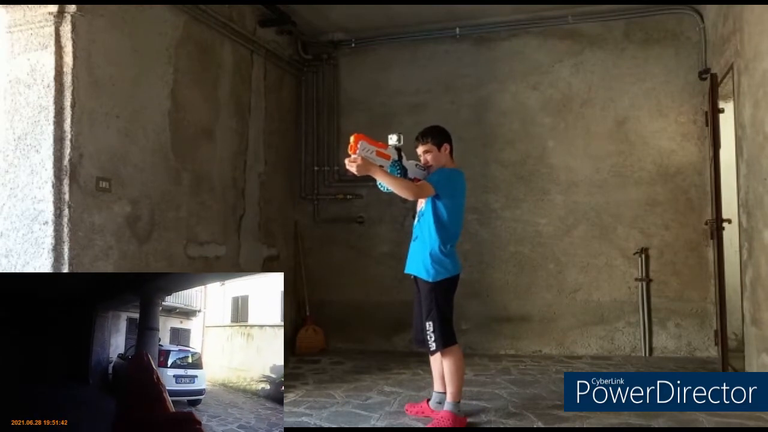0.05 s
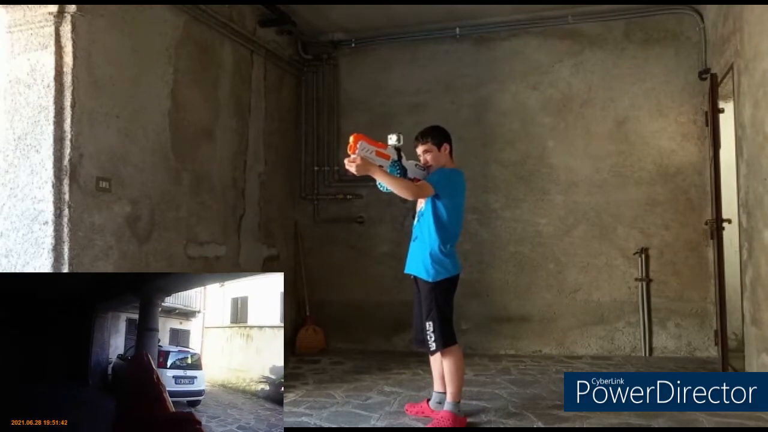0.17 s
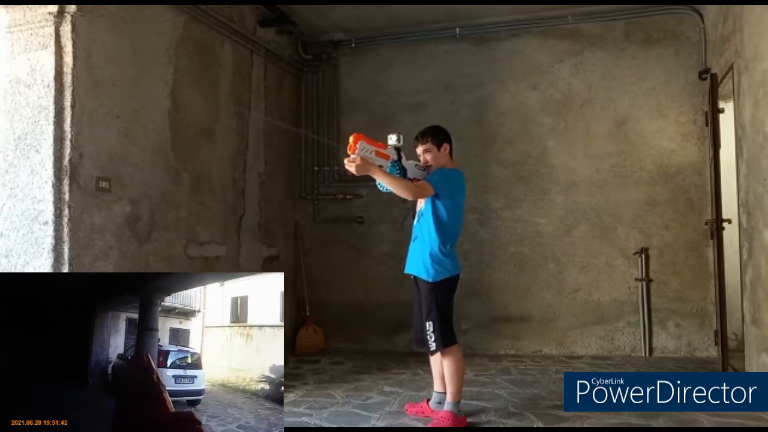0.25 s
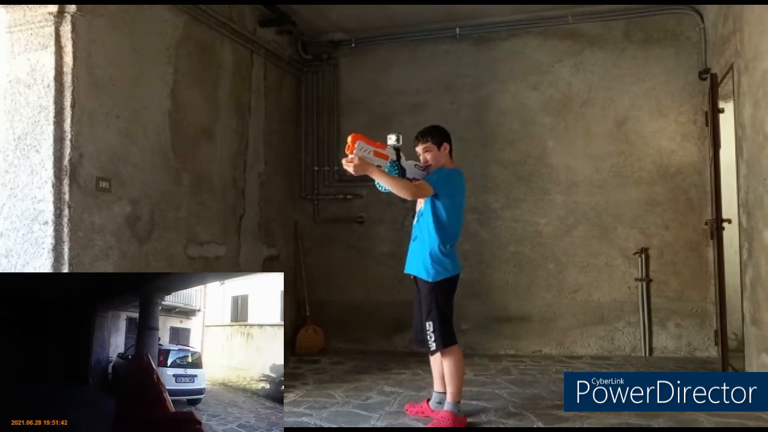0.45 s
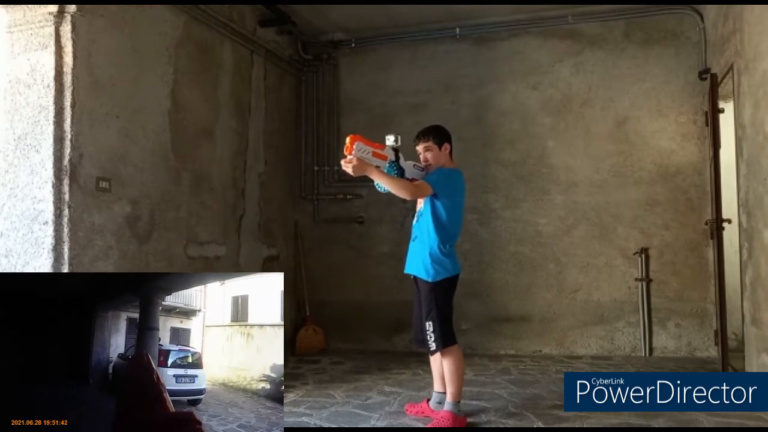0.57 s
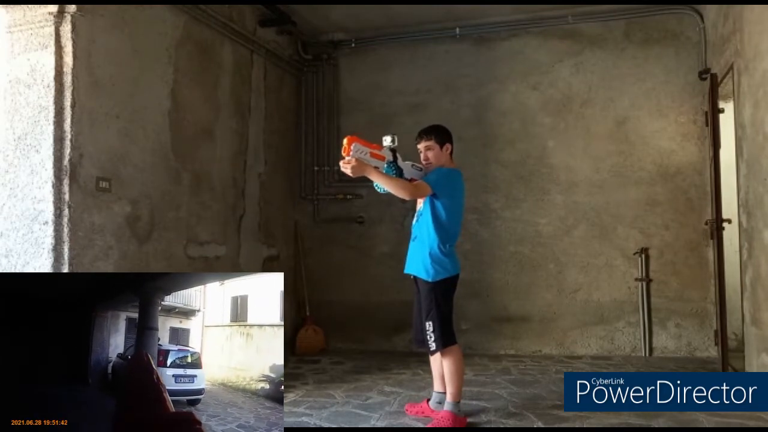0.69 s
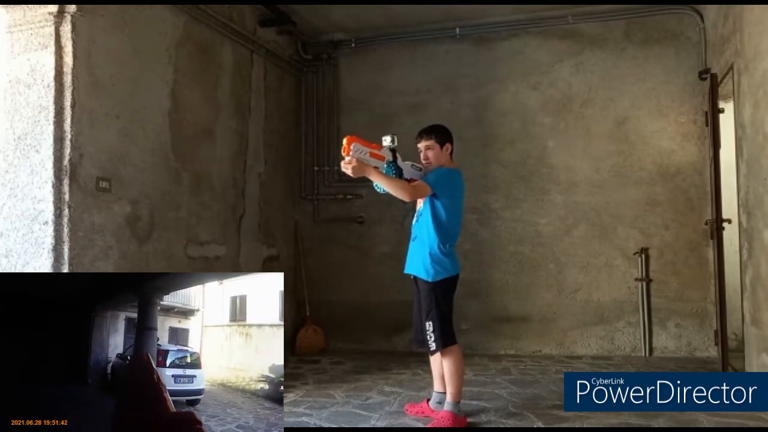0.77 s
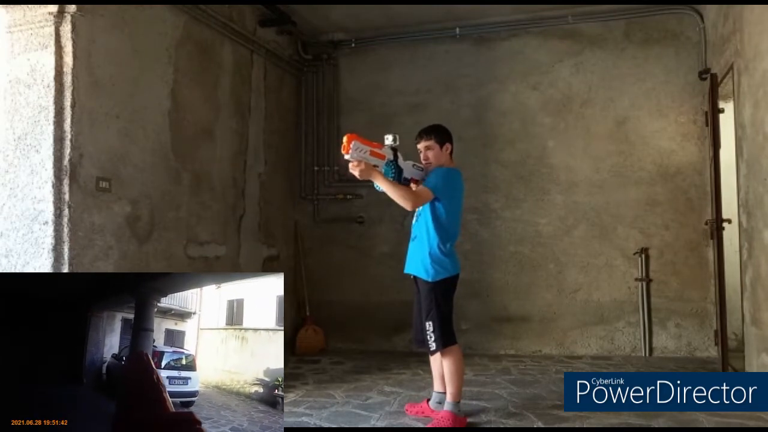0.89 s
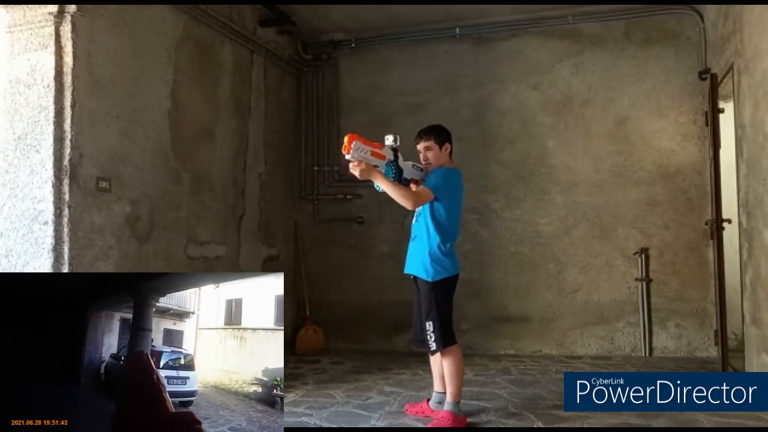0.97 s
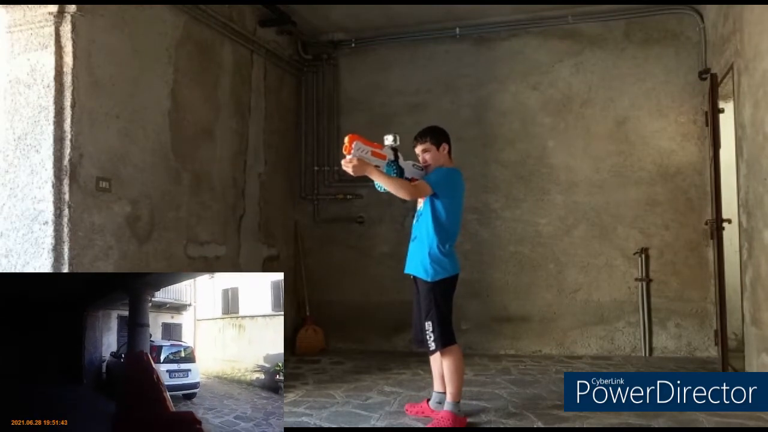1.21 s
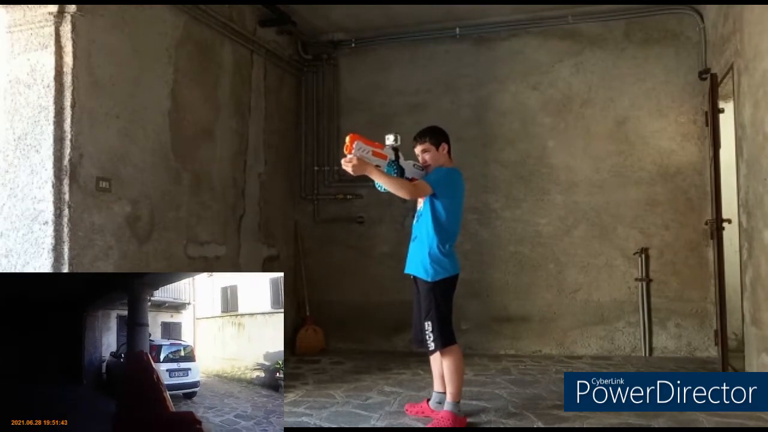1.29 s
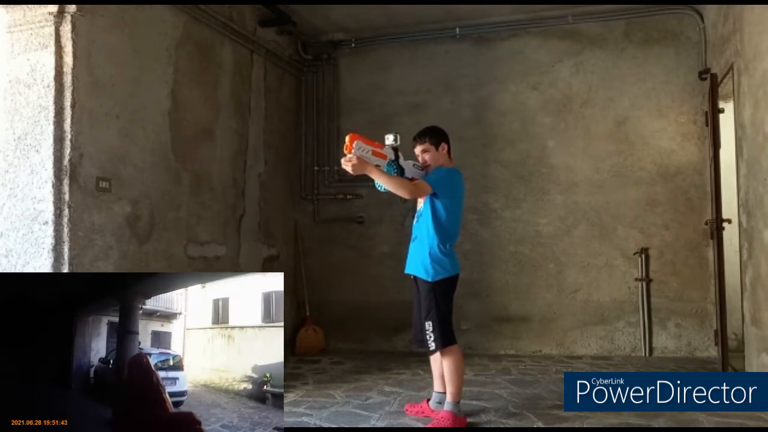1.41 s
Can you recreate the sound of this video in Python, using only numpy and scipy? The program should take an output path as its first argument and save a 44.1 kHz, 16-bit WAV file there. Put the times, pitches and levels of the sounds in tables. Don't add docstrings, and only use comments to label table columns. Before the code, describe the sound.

After a faint trigger creak, one sharp toy gun thump rings through a bare stone room; its tail fades under a quick cluster of plastic cocking clacks and a final softer knock, heard from a few metres.

```python
import sys
import numpy as np
from scipy import signal
from scipy.fft import rfft, irfft
from scipy.io import wavfile
from scipy.ndimage import uniform_filter1d

SR = 44100
rng = np.random.default_rng(int(sys.argv[2]) if len(sys.argv) > 2 else 0)


def level_to_linear(level):
    exponent = np.asarray(level, float) / 20
    return 10 ** exponent


def bounce(signal):
    frames = np.transpose(np.atleast_2d(signal))
    limited = np.clip(frames, -1, 1)
    pcm = np.round(limited * 32767).astype(np.int16)
    wavfile.write(sys.argv[1], SR, pcm)


N = 63945

KNOCK_S = [.7512, .7548, .804, .8126, .845, .865, .8675, .8762, .881, .915, 1.1775, 1.1798, 1.19, 1.202]


def at(s):
    return int(s * SR)


def unit(x):
    return x / np.sqrt(np.sum(x ** 2))


def decay(t, t60):
    return np.exp(-np.log(1000) * t / t60)


def curve(hz, table):
    table = np.array(table)
    return np.interp(np.log(np.maximum(hz, 1)), np.log(table[:, 0]), table[:, 1])


def colour(x, table, modes=(), size=8192):
    f = np.arange(size // 2 + 1) * SR / size
    power = level_to_linear(curve(f, table)) ** 2
    for hz, db, t60 in modes:
        detune = (f - hz) * 2 * np.pi * t60 / np.log(1000)
        power = power + level_to_linear(db) ** 2 / (1 + detune ** 2)
    cepstrum = irfft(np.log(power) / 2)
    cepstrum[1:size // 2] *= 2
    cepstrum[size // 2 + 1:] = 0
    response = unit(irfft(np.exp(rfft(cepstrum))))
    return signal.fftconvolve(x, response)[:len(x)]


def ring(x, modes):
    t = np.arange(N) / SR
    body = sum(level_to_linear(db) * np.sin(2 * np.pi * hz * t) * decay(t, t60) for hz, db, t60 in modes)
    return signal.fftconvolve(x, body)[:N]


def burst(s, db, length):
    out, t = np.zeros(N), np.arange(2048) / SR
    noise = rng.standard_normal(len(t))
    noise[0] = -3
    for _ in range(6):
        spec = rfft(noise * np.exp(-t / length))
        noise = irfft(spec / np.abs(spec))
        noise = noise * np.exp(np.minimum(t / length, 4)) / np.max(np.abs(noise))
        noise = np.clip(noise, -1, 1)
    out[at(s):at(s) + len(t)] = 2 * level_to_linear(db) * noise * np.exp(-t / length)
    return out


def tick(s, db):
    out = np.zeros(N)
    out[at(s)] = level_to_linear(db)
    return out


def town_hum():
    # pitch_hz, level_db per Hz
    traffic = [(18, -60), (30, -19), (318, -16), (402, -12.5), (431, -6), (484, -22), (519, -19),
               (810, -30.5), (8000, -62), (10400, -88), (17600, -120)]
    level_db, width = -65, 0.58
    mid, side = (colour(rng.standard_normal(N + 4096), traffic)[4096:] for _ in range(2))
    return level_to_linear(level_db) * np.array([mid + width * side, mid - width * side])


def garage():
    # pitch_hz, t60_s
    room_t60 = [(60, 2.1), (250, 1.65), (500, 1.16), (1200, 0.99), (2500, 0.94), (5000, 0.69), (9000, 0.51),
                (15000, 0.19)]
    # pitch_hz, level_db, t60_s
    room_modes = [(75.1, 5, 1.16), (134.6, 0, 2), (212.5, 3, 2.54), (257.2, 0.5, 2.3), (578.7, 1.5, 1.93)]
    room_db, modes_db = 9, -8
    first_echo_s, build_s = 0.00405, 0.0011
    alike_hz, bass_side = 700, 0.06
    t, f, out = np.arange(N) / SR, np.arange(N // 2 + 1) * SR / N, 0
    mid, side = rfft(rng.standard_normal((2, N)))
    side = side * np.sqrt(bass_side ** 2 + f ** 2 / (f ** 2 + alike_hz ** 2))
    pair = np.array([mid + side, mid - side])
    for octave in np.arange(4.5, 15, .5):
        share = np.clip(1 - 2 * np.abs(np.log2(f + 1) - octave), 0, 1)
        out = out + irfft(pair * share, N) * decay(t, curve(2 ** octave, room_t60))
    late = np.maximum(t - first_echo_s, 0)
    out = out * (1 - np.exp(-late / build_s))
    boom = level_to_linear(modes_db - 45.5) * ring(tick(first_echo_s, 0), room_modes)
    return level_to_linear(room_db) * np.sqrt(2) * unit(out) + boom


def spring_hum():
    start_s, end_s, pull_s = .765, .872, 0.026
    pitch_hz, sag_hz, settle_s = 284.7, 24.59, 0.011
    level_db, flutter_db, t60_s = -33, 3.5, 0.07
    t = np.arange(N) / SR
    pull = np.clip((t - start_s) / pull_s, 0, 1) * decay(np.maximum(t - end_s, 0), t60_s)
    hz = pitch_hz - sag_hz * np.exp(-np.maximum(t - start_s, 0) / settle_s)
    wobble = uniform_filter1d(rng.standard_normal(N), size=600)
    level = level_to_linear(level_db + flutter_db * 15 * np.roll(wobble, N // 2))
    return level * pull * np.sin(2 * np.pi * np.cumsum(hz) / SR + 6 * wobble)


def slide_scrape():
    # start_s, end_s, start_db, end_db
    strokes = [
        (0.787, 0.845, -73, -36.5),
        (0.858, 0.86, -60, -39.5),
    ]
    grains_per_s, spread_db = 2000, -1
    t = np.arange(N) / SR
    grains = (rng.random(N) < grains_per_s / SR) * rng.standard_normal(N)
    grains = grains * level_to_linear(spread_db * rng.exponential(size=N))
    swell = sum(level_to_linear(np.interp(t, [a, b], [db0, db1])) * (t > a) * (t < b) for a, b, db0, db1 in strokes)
    return grains * swell


def slide():
    # level_db, rattle_s, body_db
    blows = [(-43.5, 0.0053, -40.5), (-40.5, 0.0032, -25), (-44, 0.011, 3), (-45, 0.0077, 11.5),
             (-28, 0.0037, -28), (-27.5, 0.0075, -8.5), (-28, 0.0044, -4.5), (-24, 0.0086, -10),
             (-26, 0.0049, -13.5), (-35, 0.019, -5), (-35, 0.00269, -12.5), (-33.5, 0.0037, -23.5),
             (-44, 0.013, -15), (-56, 0.0062, -10)]
    # pitch_hz, level_db per Hz
    knock_colour = [(60, -33), (150, -28), (570, -13), (1400, -11), (3000, -13), (4500, -13.5), (9000, -19),
                    (16000, -26)]
    # pitch_hz, level_db, t60_s
    slide_body = [(610.6, -2.5, 0.061), (900, 3.5, 0.021), (1146, 6, 0.013), (1552, 4.5, 0.055),
                  (2150, -18, 0.0092), (2940, 6.5, 0.011), (8700, -29, 0.0066)]
    # pitch_hz, level_db, t60_s
    catch = [(2770, -9, 0.069), (7660, -5.5, 0.016), (855, -6, 0.083), (580, 4, 0.019), (1700, 1.5, 0.027)]
    # pitch_hz, level_db, t60_s
    grip = [(597.7, -3.5, 0.17), (787, 3.5, 0.03), (2168, -1, 0.043), (1440, -6.5, 0.056),
            (2970, -3.5, 0.033), (3830, 2.5, 0.022)]
    catch_db, grip_db = -35.5, -44
    scrape = slide_scrape()
    knocks = sum(burst(s, db, length) for s, (db, length, _) in zip(KNOCK_S, blows))
    pushes = sum(tick(s, db + body_db) for s, (db, _, body_db) in zip(KNOCK_S, blows))
    contact = colour(knocks + 3 * scrape, knock_colour)
    body = ring(.5 * pushes + 0.062 * scrape, slide_body)
    catch_ring = ring(tick(KNOCK_S[0], catch_db), catch)
    grip_ring = ring(tick(KNOCK_S[-3], grip_db), grip)
    return contact + body + catch_ring + grip_ring


def trigger_creaks():
    # start_s, level_db
    creaks = [
        (0.139, -74.5),
        (0.181, -64.5),
    ]
    # pitch_hz, level_db per Hz
    creak_colour = [(350, -57), (600, -2.5), (1970, -7), (4390, -15.5), (8280, -20), (10000, -25),
                    (13000, -65), (22000, -120)]
    return colour(sum(burst(s, db, 0.017) for s, db in creaks), creak_colour)


def plunger_bounce():
    # pitch_hz, level_db, t60_s
    rebound = [(1250, 0.5, 0.066), (1546, 1, 0.068), (1030, -7.5, 0.044), (575.8, -21.5, 1.9)]
    late_bounce = level_to_linear(-27.5) * unit(burst(.2425, 0, 0.0083))
    early_bounce = level_to_linear(-21) * unit(burst(0.24, 0, 0.00256))
    return ring(late_bounce + early_bounce, rebound)


def plunger_shot():
    # pitch_hz, level_db per Hz
    slam_colour = [(40, -20), (80, -9), (400, -16.5), (1350, -8.5), (3400, -26), (5600, -24.5),
                   (8500, -22.5), (15000, -34.5)]
    # pitch_hz, level_db, t60_s
    barrel = [(1266, -3.5, 0.016), (1492, -1.5, 0.031), (1042, -8, 0.03), (1134, -7, 0.018),
              (1562, -4, 0.083), (2070, -14.5, 0.0095), (4244, -7, 0.01), (550, -10, 0.032)]
    rush_s, rush_db, rise_db_per_s = 0.18, -18.5, 4600
    slam_s, slam_db, settle_s = .2282, -6, 0.0049
    t = np.arange(N) / SR
    swell = level_to_linear(rush_db - rise_db_per_s * (slam_s - t)) * (t > rush_s) * (t < slam_s)
    rush = rng.standard_normal(N) * swell
    return colour(rush + burst(slam_s, slam_db, settle_s), slam_colour, barrel)


def direct_rings():
    # pitch_hz, level_db, t60_s
    crack = [(4340, -10, 0.014), (1680, -9, 0.0012), (7200, -15.5, .004), (11000, -18, 0.0017)]
    # pitch_hz, level_db, t60_s
    ping = [(2780, -44, 0.094), (857, -46.5, 0.067)]
    # pitch_hz, level_db, t60_s
    latch = [(931, -2, 0.11), (1190, -8, 0.033), (624, -5.5, 0.067)]
    latch_ring = ring(tick(KNOCK_S[7], -24.5), latch)
    return latch_ring + ring(tick(KNOCK_S[0], 0), ping) - ring(tick(.2277, 0), crack)


def scene():
    # pitch_hz, level_db
    room_colour = [(50, -7), (120, -3.5), (300, 3), (700, -0.5), (2000, 0.5), (5500, -4), (14000, 4)]
    direct_db, direct_low_hz = 3.5, 500
    pan_db, treble_pan_db, lag_s = -8, -0.5, 0.00011
    spring_room_db, hiss_db = -24.5, -96
    spring = spring_hum()
    dry = plunger_shot() + trigger_creaks() + plunger_bounce() + slide()
    to_walls = colour(dry + level_to_linear(spring_room_db) * spring, room_colour)
    wet = signal.fftconvolve(to_walls[None], garage(), axes=1)[:, :N]
    f, side = np.arange(N // 2 + 1) * SR / N, np.array([[.5], [-.5]])
    low_cut = signal.butter(1, direct_low_hz, "high", fs=SR, output="sos")
    near = signal.sosfilt(low_cut, dry + direct_rings())
    lead = np.exp(2j * np.pi * f * side * lag_s)
    near = irfft(rfft(near) * level_to_linear(direct_db + side * pan_db) * lead, N)
    shade = level_to_linear(side * treble_pan_db * f ** 2 / (f ** 2 + 3000 ** 2))
    blaster = irfft(rfft(near + wet) * shade, N) + spring
    return blaster + town_hum() + level_to_linear(hiss_db) * rng.standard_normal((2, N))


def top_cut(x):
    return signal.sosfilt(signal.butter(12, 16990, fs=SR, output="sos"), x)


def record(dry):
    x = signal.sosfilt(signal.butter(3, 60, "high", fs=SR, output="sos"), dry)
    x = np.tanh(1.155 * x) / 1.026
    x = signal.sosfilt(signal.ellip(8, .2, 60, 15800, fs=SR, output="sos"), x)
    return top_cut(x)


dry = scene()
out = record(dry)
bounce(out)
```